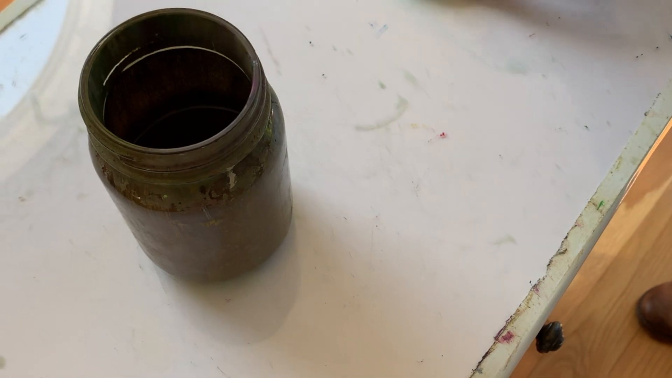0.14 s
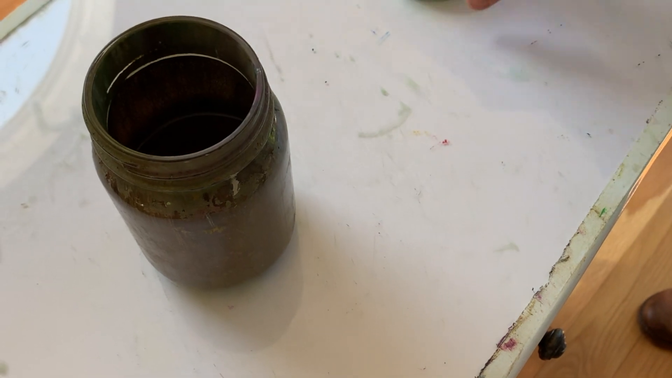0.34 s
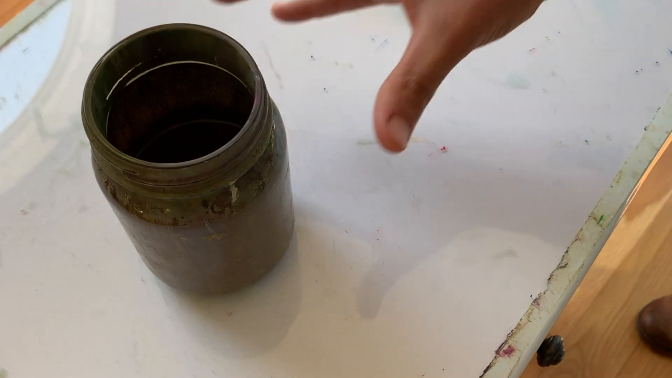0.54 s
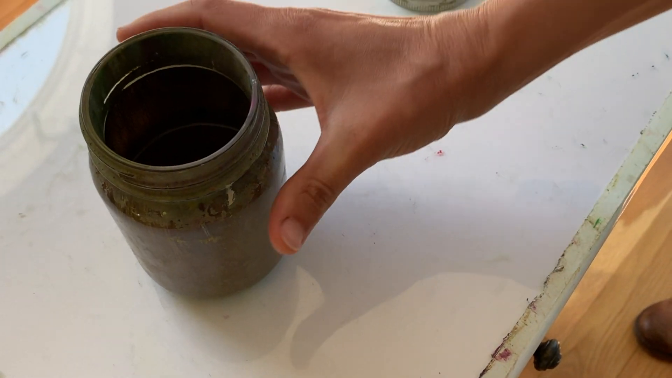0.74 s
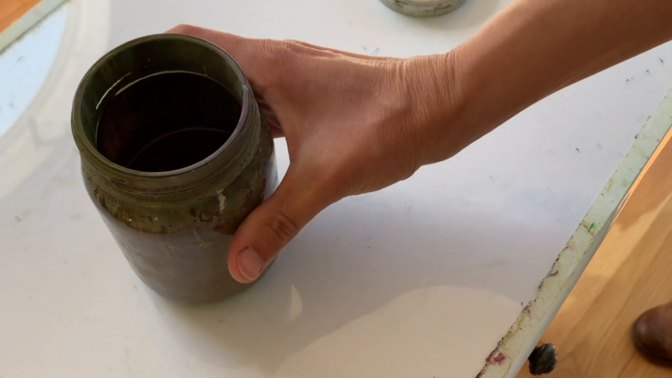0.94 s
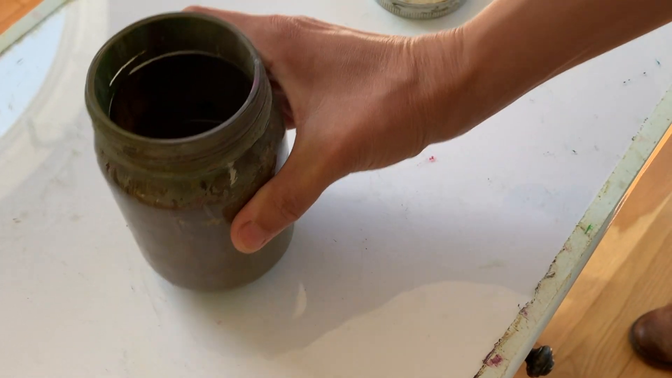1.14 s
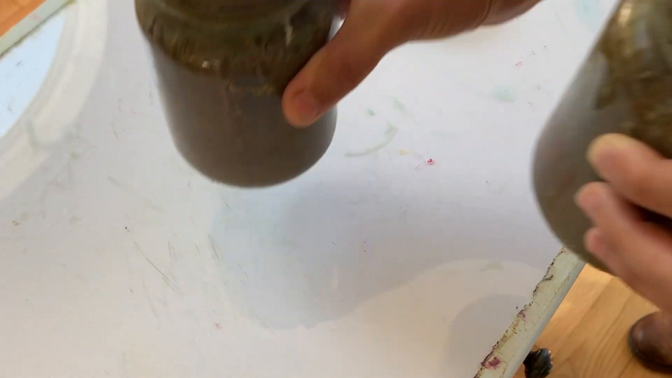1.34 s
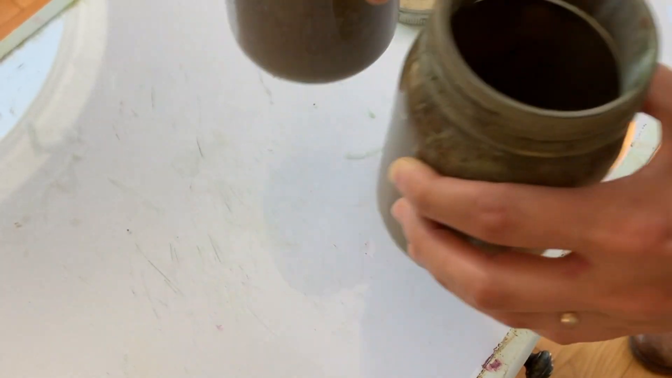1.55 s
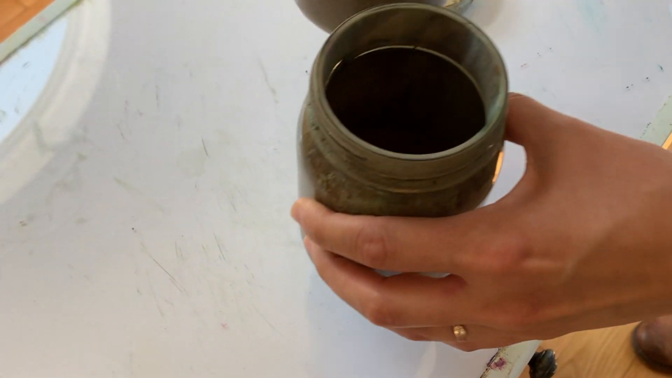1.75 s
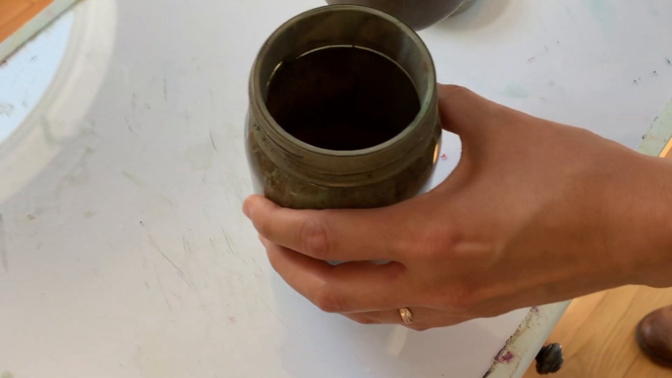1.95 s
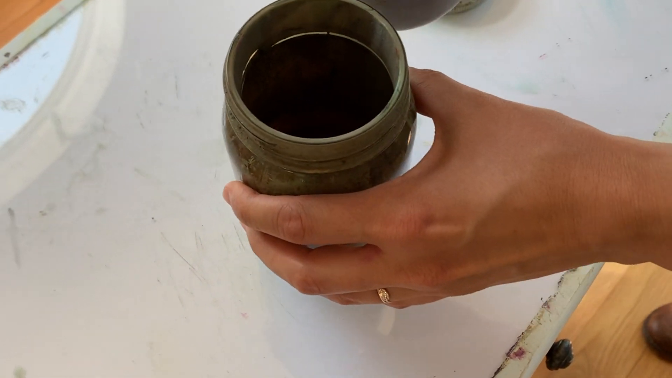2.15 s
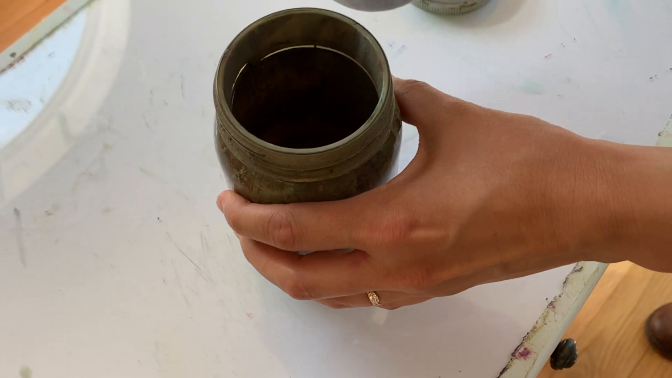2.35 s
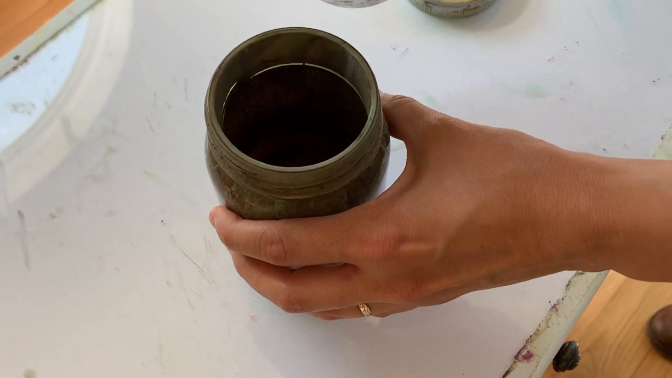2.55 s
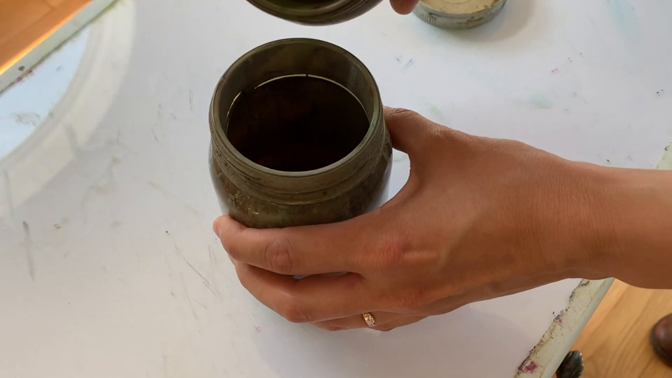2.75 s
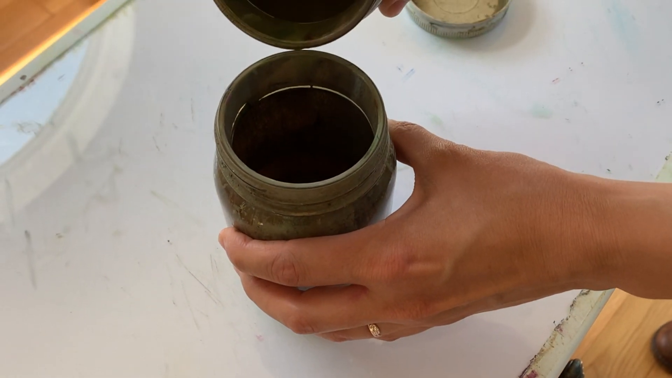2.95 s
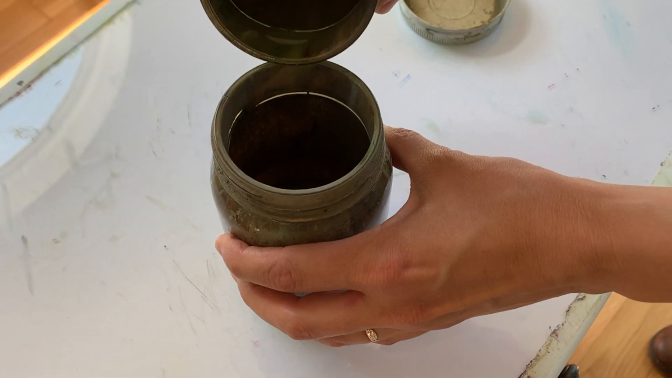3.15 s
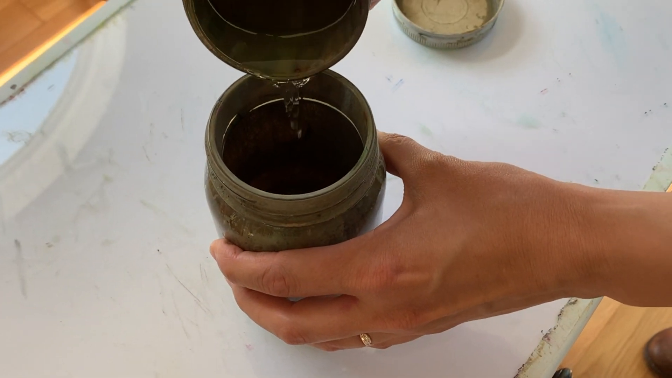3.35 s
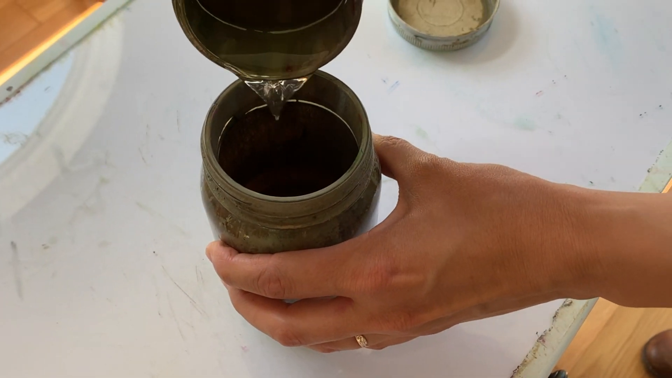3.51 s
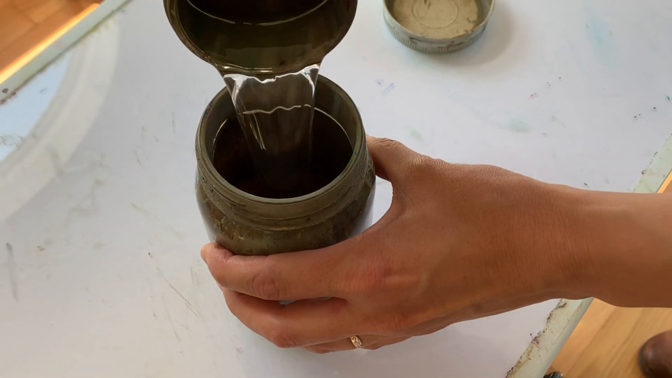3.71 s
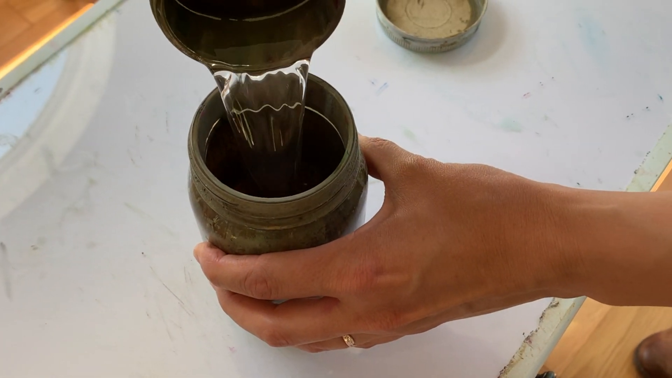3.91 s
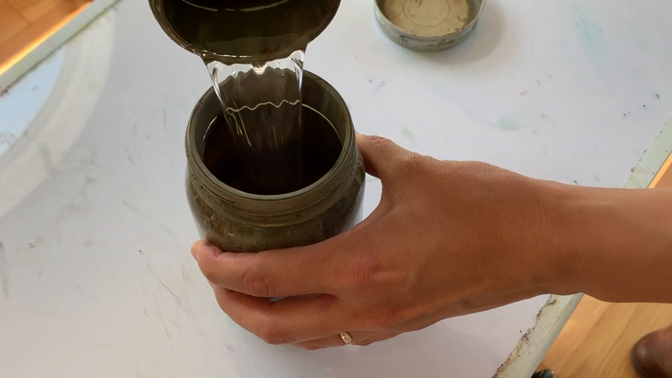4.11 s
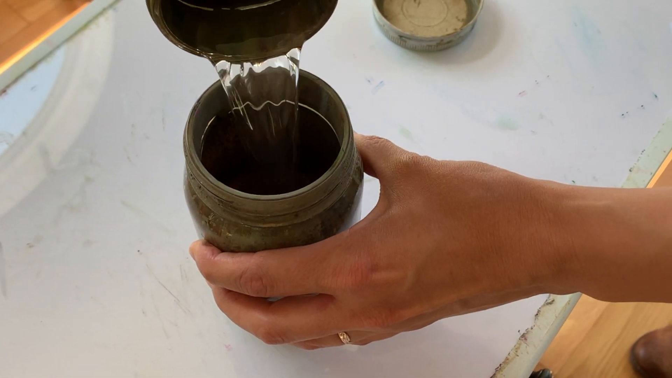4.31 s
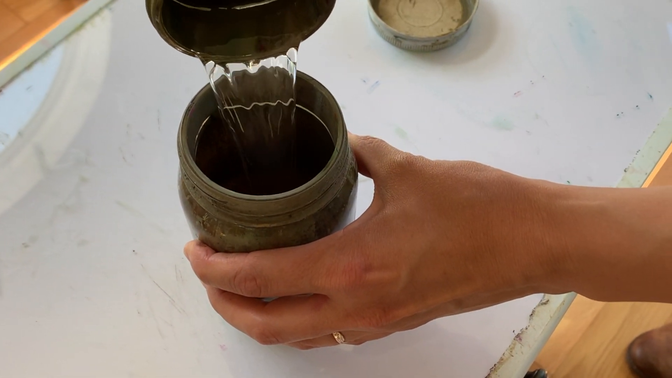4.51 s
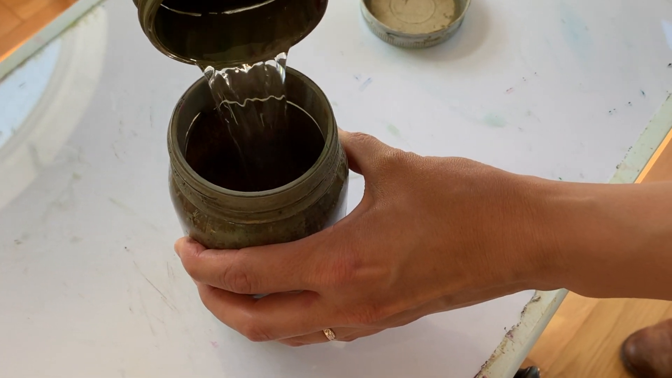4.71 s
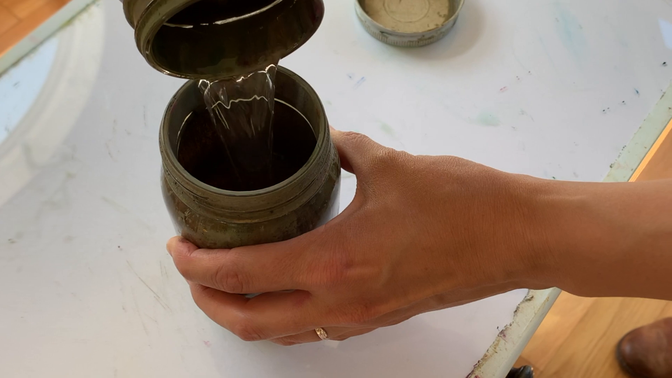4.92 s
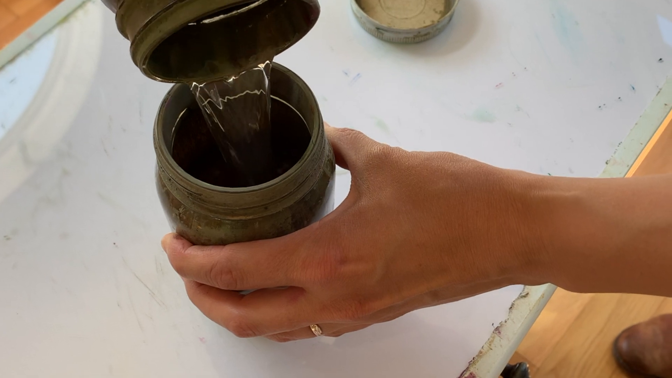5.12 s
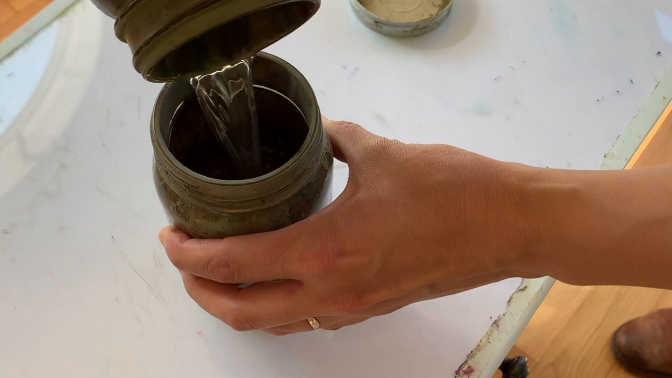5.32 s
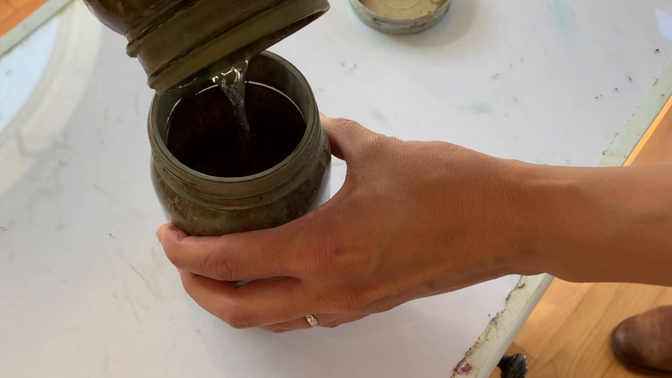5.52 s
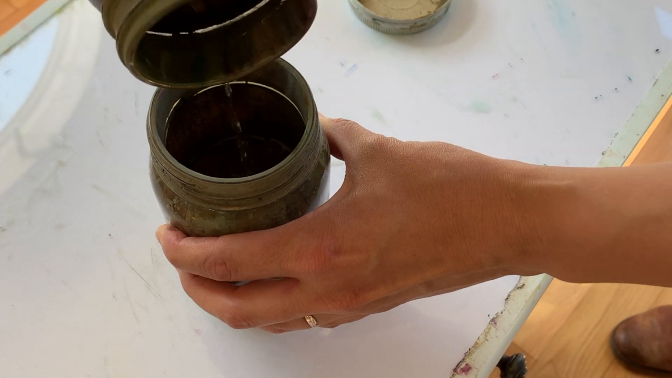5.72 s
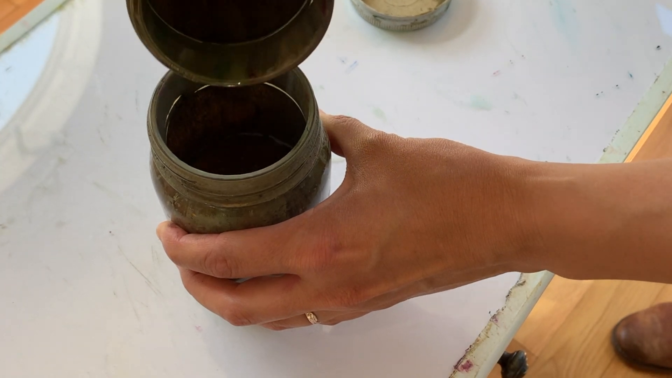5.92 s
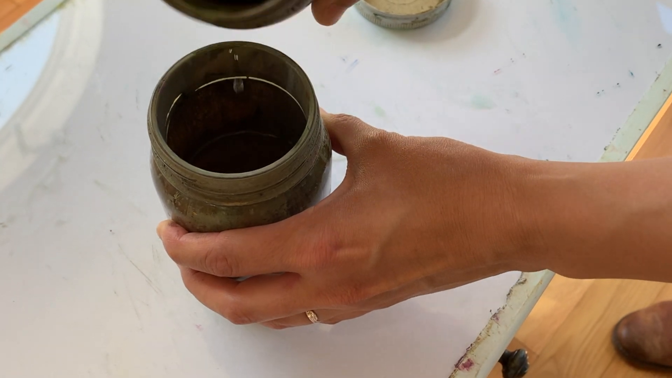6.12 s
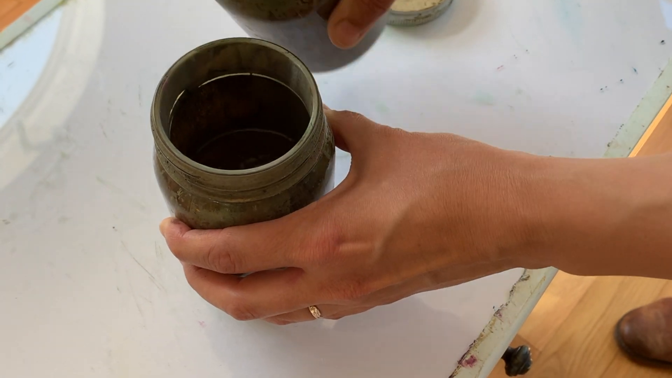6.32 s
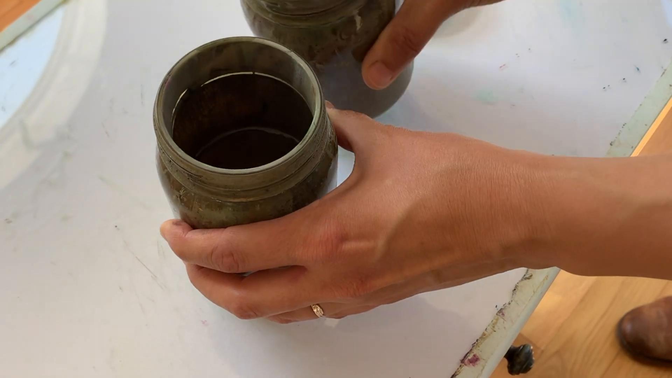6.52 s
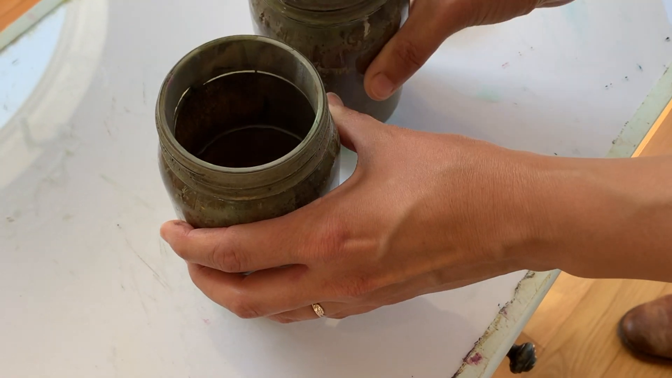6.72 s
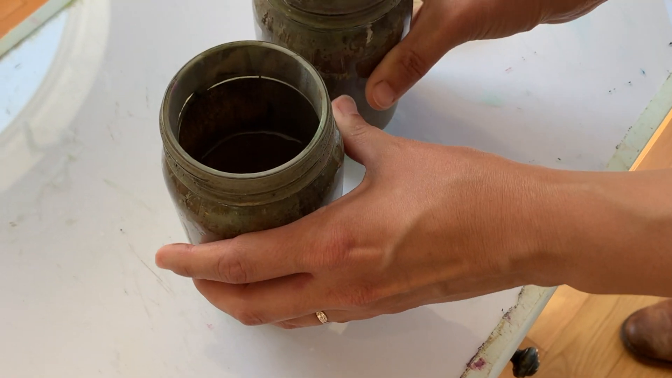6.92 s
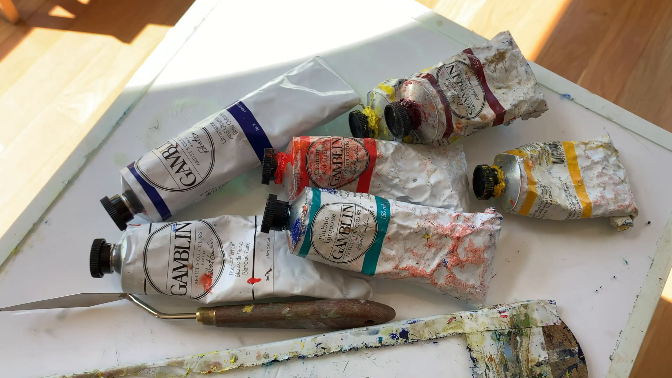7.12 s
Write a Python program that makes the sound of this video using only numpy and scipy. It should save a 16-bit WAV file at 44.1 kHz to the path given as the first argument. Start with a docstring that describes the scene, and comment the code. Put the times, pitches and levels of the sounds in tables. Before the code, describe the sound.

A quiet room with low rumble and faint hiss, heard close in stereo with short, sparse reflections. At 0 s the weak tail of a jar knock fades; a small double tick and touch come at 0.25 s. Soft thumps, brushes and skin rustle pass from 0.9 to 2.4 s. At 2.43 s a jar lands with a loud, sharp crack and short tabletop boom, with tiny bounces at 2.6 and 2.73 s. Near-silence follows. At 3.6 s bright drops start a pour, fullest around 3.9-4.2 s with fizz, churning and rapid rising bubbles, then thinning to a light trickle as the jar's air note climbs. Deeper bloops sound at 5.4-5.5 s and last drips at 5.7-5.85 s. Quiet returns; at 6.6 s a boomy, rattly knock, a ticking scrape near 6.8 s, a duller glassy knock at 6.87 s, then faint rustling to about 7.1 s.

```python
"""Glass jars are set down on a thin tabletop in a quiet room, close to a two-port microphone: table and glass
ring as decaying sines under a noisy crack and rattle. Water is poured from jar to jar: noise bursts for drops,
filtered grains for fizz, gurgle and the air note in the jar, rising sines for large bubbles.
Around them lie soft touches, ticks, thumps, a rustle of skin and cloth, and the hush of the room.
Sparse decaying echoes add distance; a tone colour with narrow dips shapes the mid signal."""
import sys
import numpy as np
from scipy import signal
from scipy.fft import rfft, irfft, next_fast_len
from scipy.io import wavfile
from scipy.ndimage import uniform_filter1d

SR = 44100
rng = np.random.default_rng(int(sys.argv[2]) if len(sys.argv) > 2 else 0)


def generate_wav(signal):
    """Clip the signal to [-1, 1] and save it as 16-bit WAV at the path in sys.argv[1]."""
    frames = np.transpose(np.atleast_2d(signal))
    scaled = np.clip(frames, -1, 1) * 32767
    pcm = np.round(scaled).astype(np.int16)
    wavfile.write(sys.argv[1], SR, pcm)


N = 315756  # samples

# jars set down, the first just before the opening so that only its tail is heard: (time [s], level [dB],
# brightness [dB/octave], table boom [dB], glass ring [dB], crack [dB], rattle [dB], boom tilt [dB/octave])
KNOCKS = [(-.03, -28, 4.3, -19, -24, -16.5, -3.5, 2), (2.435, -4, 0.63, -5.5, -12, -4.5, -21, 0),
          (6.6157, -9, -1.5, 2, -20, -12.5, -12.5, 1.5), (6.8729, -6, -9.5, -5.5, -7.5, -1.5, -11, 1)]
# a jar rocking back onto the table: (time [s], level [dB])
BOUNCES = [(2.603, -29.5), (2.734, -30.5), (6.822, -22)]
# the dull contact all bounces share: the columns of a knock from brightness on
BOUNCE_CONTACT = (-9.5, 2.5, -5.5, -11, -15.5, -2.5)
# modes of the tabletop: (frequency [Hz], level [dB], t60 [s])
TABLE_MODES = [(121.8, 1.5, 0.2), (170.5, 1.5, 0.17), (245.3, 4, 0.083), (383, -4, 0.03),
               (509.7, -4.5, 0.12), (525.4, -7.5, 0.3), (651, -13, 0.1), (726, -13.5, 0.12),
               (1130, 5, 0.014), (1350, -14.5, 0.05)]
# modes of a jar: (frequency [Hz], level [dB], t60 [s])
GLASS_MODES = [(1534, 0, .03), (1655, -2, .04), (2110, -4, .04), (2512, -8, .04), (6625, -3, .08)]
# spectrum of first contact: (frequency [Hz], level [dB])
CRACK_SPECTRUM = [(150, -33), (400, 3.5), (1000, -4.5), (1600, 1.5), (2600, -11.5), (4000, -18.5),
                  (6800, -18), (9500, -22), (13000, -28.5)]
# stereo spread of sounds on the table: (frequency [Hz], side over mid [dB])
TABLE_SIDE = [(60, -4), (130, -17), (290, -9), (640, -2), (1410, 0), (3100, 2), (6820, 0), (15000, 5)]
# decay of the room: (frequency [Hz], t60 [s])
ROOM_T60 = [(125, 0.33), (500, 0.49), (1000, 0.31), (2500, 0.43), (6500, 0.39), (12000, 0.22)]
# echo against direct sound: (frequency [Hz], level [dB])
ROOM_COLOUR = [(125, -1.5), (500, -9), (2000, -10.5), (5000, -3.5), (8000, -7.5), (10000, -18.5)]
# spectrum of the quiet room: (frequency [Hz], relative level [dB])
HUSH_SPECTRUM = [(20, -23.5), (38, -7), (60, 5.5), (105, -6.5), (139, -24), (195, -10), (479, -28.5),
                 (670, -37), (966, -47), (1690, -41.5), (4790, -52.5), (6910, -46), (15200, -58.5)]
# stereo spread of the quiet room: (frequency [Hz], side over mid [dB])
HUSH_SIDE = [(60, -17.5), (110, 4), (200, -3), (380, 5), (700, 14.5), (1290, 11), (2380, 6), (4400, 8),
             (8120, -10.5), (15000, 5.5)]
# depth of the drifting patches in the hush: (frequency [Hz], depth [dB])
PATCH_DEPTH = [(60, 1.2), (200, 3), (700, 3.5), (3000, 2.5), (8000, .8)]
# skin and cloth moving: (time [s], rustle level [dB])
MOVES = [(.4, -77.5), (.55, -93), (.64, -76), (.73, -85), (.85, -82.5), (1.19, -85.5), (1.45, -70.5),
         (1.58, -78), (1.95, -74.5), (2.19, -89.5), (2.35, -75), (2.69, -94.5), (2.95, -82), (3.1, -88.5),
         (6.5, -83), (6.8, -58.5), (7.0, -81), (7.16, -75)]
# spectrum of the rustle: (frequency [Hz], relative level [dB])
RUSTLE_SPECTRUM = [(300, -17), (600, 6), (1200, -4.5), (2300, -5.5), (4200, -13.5), (5200, -21.0), (16000, -47.0)]
# soft touches of hands and jars: (time [s], level [dB], centre [Hz], length [ms])
TOUCHES = [(0.246, -40.5, 950, 3), (0.246, -46, 1950, 13.5), (0.253, -38, 754, 5.6), (1.026, -64, 1200, 12),
           (1.053, -66, 2800, 25), (1.066, -58, 2400, 4), (1.419, -48.5, 460, 23),
           (1.595, -60.5, 1640, 8.3), (1.933, -53.5, 3540, 1.1), (2.164, -59.5, 2000, 18),
           (2.398, -56, 1720, 36), (2.715, -62.5, 614, 9.4), (2.752, -66, 1880, 6.4),
           (2.89, -62.5, 1770, 8.4), (6.601, -38.5, 1510, 47), (6.782, -46.5, 241, 120),
           (6.768, -47.5, 1830, 11), (0.929, -66, 2130, 15), (1.212, -66.5, 2400, 15),
           (1.352, -56.5, 343, 27), (6.859, -41.5, 1610, 39)]
# bright ticks of a ring or nail on glass: (time [s], level [dB])
TICKS = [(0.2471, -49), (0.254, -52), (1.2196, -61), (6.774, -36.5), (6.7905, -46.5), (6.9795, -59),
         (7.0284, -61)]
# low thumps as weight shifts on the tabletop: (time [s], level [dB], frequency [Hz], length [s])
THUMPS = [(0.925, -44.5, 96, .09), (1.058, -50, 115, .04), (2.735, -45, 125, .04)]
# faint thin whistles around the start and end of the pour, each: (time [s], frequency [Hz], level [dB])
WHISTLES = [
    [(3.22, 4290, -86), (3.48, 3570, -89)],
    [(3.51, 3420, -91), (3.56, 3360, -69.5), (3.63, 3295, -84.5)],
    [(5.85, 7020, -87.5), (6.2, 6870, -81.5), (6.55, 6900, -82)],
]
# the stream: (time [s], spray level [dB], gurgle level [dB])
POUR = [(3.62, -67.5, -100), (3.76, -61.5, -67.5), (3.83, -56.5, -66), (3.95, -52, -53.5), (4.17, -53, -53),
        (4.25, -62, -61.5), (4.31, -62.5, -76), (4.42, -64.5, -60), (4.55, -67.5, -71), (4.8, -66, -74.5),
        (4.9, -66, -72), (5.1, -69.5, -82.5), (5.32, -74.5, -107), (5.4, -62.5, -65.5), (5.53, -75, -62),
        (5.6, -70, -68), (5.74, -75, -59), (5.84, -94, -94), (6.0, -82, -100)]
# as the jar fills: (time [s], note of the air above the water [Hz], note over gurgle [dB],
# typical bubble pitch [Hz])
FILL = [(3.95, 508, -21, 1990), (4.05, 530, -8, 1720), (4.2, 547, -2.5, 1420), (4.4, 623, 3, 1620),
        (4.7, 690, -9.5, 2520), (5.0, 721, 5, 2080), (5.4, 744, 11.5, 1420), (5.71, 758, 0, 1370),
        (5.8, 718, 17, 1370)]
# spectrum of the spray: (frequency [Hz], relative level [dB])
FIZZ_SPECTRUM = [(2800, -18), (3700, 6), (4500, 1.5), (6200, 6), (8500, 6.5), (10600, -3), (13500, -7),
                 (15500, -2)]
# bands the jar lends the gurgle: (frequency [Hz], width [Hz], gain [dB])
WET_JAR = [(1007, 50, 9.5), (1440, 80, 7.5), (1860, 87, 10), (2760, 40, 9)]
# churning band that the stream keeps up in the jar: (time [s], level [dB])
CHURN = [(3.62, -100), (3.9, -58), (4.25, -61), (4.5, -66), (4.85, -69), (5.15, -83), (5.33, -85),
         (5.42, -69.5), (5.7, -74.5), (5.9, -102)]
# the loudest drops striking the water: (time [s], level [dB])
DROPS = [(3.6266, -49), (3.675, -43.5), (3.7455, -40), (3.8326, -42), (3.8473, -48), (3.921, -46),
         (4.738, -59), (4.883, -64), (5.0034, -60), (5.3683, -58), (5.3832, -56.5), (5.478, -56.5),
         (5.5313, -54), (5.4054, -57.5), (5.5078, -54), (5.6595, -50), (5.6998, -57.5), (5.7594, -50.5),
         (5.8005, -55), (5.8296, -56.5), (5.8414, -56)]
# large bubbles: (time [s], level [dB], starting pitch [Hz])
BUBBLES = [(3.741, -54, 1750), (3.895, -43.5, 1708), (3.934, -46, 1442), (4.037, -36.5, 1816),
           (3.949, -48, 1887), (4.06, -46, 1870), (4.145, -49, 998), (4.929, -53, 2760), (4.096, -49, 1920),
           (4.245, -51, 1024), (3.851, -47.5, 1746), (3.917, -43.5, 1829), (3.986, -51, 1372),
           (4.024, -33, 1450), (4.049, -33.5, 1845), (4.173, -52, 1312), (4.222, -49.5, 1005),
           (4.008, -49, 2300), (4.408, -57, 2300), (4.47, -58, 2350), (4.648, -60, 2500),
           (4.838, -54, 2350), (5.004, -57, 2850), (4.837, -50, 2800), (4.884, -42, 1370),
           (5.004, -48.5, 2299), (5.391, -45, 972), (5.404, -43, 750.5), (5.433, -36.5, 715.4),
           (5.448, -48.5, 458), (5.486, -38.5, 487.6), (5.385, -53, 4410), (5.405, -51.5, 4280),
           (5.4034, -50, 1540), (5.535, -53, 500), (5.628, -56, 600), (5.508, -53.5, 4346),
           (5.534, -61, 2500), (5.614, -52, 5570), (5.7082, -54, 1590), (5.761, -61, 1770),
           (5.842, -64, 3950), (5.735, -43, 717), (5.71, -42, 643), (5.734, -41, 1037)]
# stereo spread of the water: (frequency [Hz], side over mid [dB])
POUR_SIDE = [(270, -15.5), (450, -11), (740, 0), (1220, -7), (2010, -1), (3330, 5.5), (5500, 5),
             (9080, -14), (15000, 13)]
# tone colour of the mid signal, with narrow dips: (frequency [Hz], gain [dB])
MID_COLOUR = [(25, -26.5), (42, -1.5), (2800, -3.5), (3250, -5.5), (3700, -1.5), (4500, -2.5), (5100, -11),
              (5800, -2), (11000, 0), (12300, -17), (13300, 0.5)]

LEAD = 4410  # samples computed ahead of zero
HUSH_DB = -56.5  # mid level ahead of the tone colour
TICK_HZ, DROP_HZ = 7400, 7810  # nominal centres
SCATTER = 0.06  # greatest upward stray of a centre, as a share
POUR_S = (3.62, 6.0)  # the water runs from, to
SIZE_SPREAD = 0.5  # scatter of bubble pitch round the typical one, as a log ratio
CHURN_HZ, CHURN_WIDTH_HZ = 2353, 262
BUBBLE_T60_S, BUBBLE_DAMPING = 0.043, 0.23  # ring time at 1 kHz; it falls by this power of pitch
EDGE_HZ = 15900  # upper band limit


def amp(db):
    """Decibels to linear gain."""
    return 10 ** (np.asarray(db) / 20)


def evened(x):
    """Scales to an rms of 1."""
    return x / np.sqrt(np.mean(x ** 2) + 1e-20)


def read(points, hz):
    """Reads a curve along log frequency."""
    f, value = np.transpose(points)
    return np.interp(np.log(hz + 1), np.log(f + 1), value)


def columns(rows):
    """Reads each column of a time table at every sample."""
    s, *cols = np.transpose(rows)
    return [np.interp(np.arange(N) / SR, s, c) for c in cols]


def add(mix, s, sound):
    """Lays a sound into the mix from s seconds on."""
    part = mix[round(s * SR):][:len(sound)]
    part += sound[:len(part)]


def colour(x, points):
    """Filters by a spectrum in dB."""
    n = next_fast_len(x.shape[-1])
    gain = amp(read(points, np.fft.rfftfreq(n, 1 / SR)))
    return irfft(rfft(x, n) * gain, n)[..., :x.shape[-1]]


def resonate(x, hz, width):
    """Shifts the curve hz down to zero, smooths, and shifts back: a resonance of gain 1."""
    turn = np.exp(2j * np.pi * np.cumsum(hz * np.ones(len(x))) / SR)
    r = np.exp(-np.pi * width / SR)
    return 2 * (turn * signal.lfilter([1 - r], [1, -r], x / turn)).real


def flutter(width, depth_db, size=N):
    """Random gain, slowed by smoothing twice over width samples."""
    drift = uniform_filter1d(uniform_filter1d(rng.standard_normal(size), width), width)
    return amp(depth_db * evened(drift))


def grainy(per_s, spread_db, bed, size=N):
    """Sparse clicks of uneven size over a bed of plain noise."""
    sign, chance, plain = rng.standard_normal(size), rng.random(size), rng.standard_normal(size)
    sizes = amp(spread_db * np.minimum(rng.exponential(1, size), 4))
    clicks = sign * sizes * (chance < per_s / SR)
    return evened(evened(clicks) + bed * plain)


def ports(x, side):
    """Two close ports hear one source with a phase gap: the side is the mid turned a quarter cycle."""
    turned = colour(signal.hilbert(x, next_fast_len(len(x)))[:len(x)].imag, side)
    return np.array([x - turned, x + turned])


def room(x):
    """Sparse echoes of random sign, each band dying at its own speed, partly shared between channels."""
    taps = np.zeros((2, SR // 2))
    at = np.arange(200, SR // 2 - 20, 10) + rng.integers(0, 10, (2, (SR // 2 - 211) // 10))
    np.put_along_axis(taps, at, rng.choice([-1., 1.], at.shape), 1)
    taps += .6 * taps[::-1]
    hz, t, z = signal.stft(taps, SR, nperseg=256)
    decay = amp(-60 * t / read(ROOM_T60, hz)[:, None])
    tail = signal.istft(z * decay, SR, nperseg=256)[1]
    tail = colour(tail / np.linalg.norm(tail[0]), ROOM_COLOUR)
    tail *= flutter(300, 0.83, tail.shape[1])  # echoes arrive in clumps
    return signal.fftconvolve(x[None], tail, axes=1)[:, :len(x)]


def ring(modes, t, scatter_db, tilt_db=0):
    """Decaying sines that build up over a cycle or two; the point of contact shifts each mode's share."""
    total = np.zeros(len(t))
    for hz, db, t60 in modes:
        start_db = db + tilt_db * np.log2(hz / 250) + scatter_db * rng.standard_normal()
        total += amp(start_db - 60 * t / t60) * (1 - np.exp(-t * hz / 1.3)) * np.sin(2 * np.pi * hz * t)
    return total


def knocks():
    """A blow rings table and glass, with a short loose rattle; each knock has its own brightness."""
    near, far = np.zeros(N + LEAD), np.zeros(N + LEAD)
    t = np.arange(16384) / SR
    hz = np.fft.rfftfreq(len(t), 1 / SR)
    lag = np.exp(-4j * np.pi * 0.046 * np.sqrt(hz + 60))  # bending waves: bass travels slower
    hit, rebound = np.exp(-((t - .001) * 25000) ** 2), np.exp(-((t - .0016) * 25000) ** 2)
    crack = colour(hit - 0.39 * rebound, CRACK_SPECTRUM)
    crack = crack / abs(crack).max()
    contacts = KNOCKS + [row + BOUNCE_CONTACT for row in BOUNCES]
    for s, db, slope_db, boom_db, glass_db, crack_db, rattle_db, tilt_db in contacts:
        noise = evened(colour(rng.standard_normal(len(t)), CRACK_SPECTRUM))
        rattle = noise * np.exp(-t / 0.0079) * (t > .001)
        boom = amp(boom_db) * ring(TABLE_MODES, t, 0.51, tilt_db)
        body = boom + amp(glass_db) * ring(GLASS_MODES, t, 0.59)
        clatter = amp(crack_db) * crack + amp(rattle_db) * rattle
        # the ringing is heard close by, less of it fills the room
        blow = np.array([0.13 * body + clatter, 0.03 * body + clatter])
        blow = irfft(rfft(blow) * lag * amp(slope_db * np.log2(1 + hz / 1000)))
        blow = amp(db) * blow * np.clip((.35 - t) * 20, 0, 1)  # faded out by 0.35 s
        add(near, s + LEAD / SR, blow[0])
        add(far, s + LEAD / SR, blow[1])
    return ports(near[LEAD:], TABLE_SIDE) + room(far)[:, LEAD:]


def hush():
    """Room rumble and hiss: random short-time spectra with drifting patches, deepest in the middle range."""
    frames, hz = N // 512 + 5, np.fft.rfftfreq(2048, 1 / SR)
    a, b, c, d, patches = rng.standard_normal((frames, 1025, 5)).T
    patches = evened(uniform_filter1d(uniform_filter1d(patches, 20, 0), 5, 1))
    patch_db = read(PATCH_DEPTH, hz)[:, None] * patches
    z = np.array([a + 1j * b, (c + 1j * d) * amp(read(HUSH_SIDE, hz))[:, None]])
    z = z * amp(read(HUSH_SPECTRUM, hz)[:, None] + patch_db)
    mid, side = signal.istft(z, nperseg=2048, noverlap=1536)[1][:, :N]
    return amp(HUSH_DB) * np.array([mid + side, mid - side]) / mid.std()


def movement():
    """A grainy, uneven rustle of skin and cloth, partly shared between channels."""
    rustle_db, = columns(MOVES)
    rustle = np.array([grainy(900, 2.2, 1.1) for _ in range(2)])
    rustle = colour(rustle + 0.5 * rustle[::-1], RUSTLE_SPECTRUM)
    return amp(rustle_db) * evened(rustle * flutter(1500, 1.4))


def touches():
    """Dull puffs of noise, wide round their centre, with a soft start."""
    out, t = np.zeros(N), np.arange(8000) / SR
    for s, db, hz, ms in TOUCHES:
        noise = rng.standard_normal(len(t))
        puff = evened(resonate(resonate(noise, hz, 0.32 * hz), hz, 0.81 * hz))
        swell = (1 - np.exp(-4000 * t / ms)) * np.exp(-1000 * t / ms)
        add(out, s, amp(db) * puff * swell)
    return out


def snaps(rows, centre_hz, width_hz, decay_s, tail_db):
    """Ticks or drops: sharp bursts of noise round a centre, with a brief spray behind."""
    out, t = np.zeros(N), np.arange(2000) / SR
    for s, db in rows:
        hz = centre_hz * (1 + SCATTER * rng.uniform(-1.53, 1))
        noise = rng.standard_normal(len(t))
        burst = evened(resonate(resonate(noise, hz, width_hz), hz, width_hz))
        fall = np.exp(-t / decay_s) + amp(tail_db) * np.exp(-t / 0.0045)
        add(out, s, amp(db) * burst * (1 - np.exp(-t / 0.00028)) * fall)
    return out


def thumps():
    """A few cycles of the table flexing: a quick swell, a hold, a damped end."""
    out = np.zeros(N)
    for s, db, hz, length in THUMPS:
        t = np.arange(0, length, 1 / SR)
        swell = np.sqrt(abs(np.sin(np.pi * t / length)))
        add(out, s, amp(db) * swell * np.sin(2 * np.pi * hz * t))
    return out


def whistles():
    """Unsteady bands of noise, the higher the wider."""
    out = np.zeros(N)
    for rows in WHISTLES:
        hz, db = columns(rows)
        width = 1.2 * (rows[-1][1] / 1000) ** 3.3
        on = slice(round(rows[0][0] * SR), round(rows[-1][0] * SR))
        band = evened(resonate(resonate(rng.standard_normal(N), hz, width), hz, 2 * width) * flutter(900, 2.8))
        out[on] += (amp(db) * band)[on]
    return out


def spray(n):
    """Fine droplets: each size of droplet comes in its own clusters of bright grains."""
    specks = np.zeros(n)
    for hz in np.geomspace(3600, 15000, num=12):
        grains = grainy(360, 4.9 * min(hz / 6000, 1), 1.4, n) * flutter(400, 4.8, n)
        specks += resonate(resonate(grains, hz, 0.18 * hz), hz, 0.18 * hz)
    return evened(colour(specks, FIZZ_SPECTRUM) * flutter(150, 1.0, n))


def gurgling(n, centre_hz):
    """A cloud of small bubbles, sizes scattered round the centre, heard through the bands of the jar."""
    cloud, t = np.zeros(n), np.arange(2048) / SR
    for hz in np.geomspace(750, 3100, num=30):
        pop = np.exp(-t * hz / 9) * (1 - np.exp(-t / 0.00055)) * np.sin(2 * np.pi * hz * t)
        share = np.exp(-(np.log(hz / centre_hz) / SIZE_SPREAD) ** 2)
        births = grainy(60, 3.2, 0.3, n) * share
        cloud += signal.oaconvolve(births, pop / np.linalg.norm(pop))[:n]
    # the jar's bands shape the scaled cloud
    cloud = 0.47 * cloud
    gurgle = cloud.copy()
    for hz, width, db in WET_JAR:
        drift = flutter(2500, .2, n)  # the bands drift as the surface heaves
        gurgle += amp(db) * resonate(cloud / 0.47, hz * drift, width) * flutter(500, 4.6, n)
    return evened(gurgle)


def air_note(n, note_hz):
    """The shrinking air space resonates to grains; the heaving surface shakes its note."""
    note_hz = note_hz * flutter(1200, .25, n)
    note = resonate(resonate(grainy(80, 2.7, 1.0, n), note_hz, 40), note_hz, 430)
    return evened(note * flutter(600, 2.8, n))


def churning(n):
    """Five neighbouring, unsteady resonances make the churning band."""
    churn = np.zeros(n)
    for hz in CHURN_HZ + CHURN_WIDTH_HZ * np.linspace(-.5, 1.5, num=5):
        band = resonate(grainy(150, 3.5, .8, n), hz * flutter(1500, .25, n), 95)
        churn += resonate(band, hz, 300) * flutter(600, 4, n)
    return evened(churn)


def stream():
    """Spray, small bubbles, churn and the note of the air space follow the pour and the filling jar."""
    on = slice(round(POUR_S[0] * SR), round(POUR_S[1] * SR))
    n = on.stop - on.start
    curves = np.array(columns(POUR) + columns(FILL) + columns(CHURN))[:, on]
    fizz_db, gurgle_db, note_hz, note_db, centre_hz, churn_db = curves
    fizz = amp(fizz_db) * spray(n)
    inside = amp(gurgle_db) * (gurgling(n, centre_hz) + amp(note_db) * air_note(n, note_hz))
    out = np.zeros(N)
    out[on] = amp(churn_db) * churning(n) + fizz + inside
    return out


def bubbles():
    """Each bubble rings briefly and unsteadily, its pitch climbing as it nears the surface."""
    out, t = np.zeros(N), np.arange(5000) / SR
    for s, db, hz in BUBBLES:
        t60 = BUBBLE_T60_S * (1000 / hz) ** BUBBLE_DAMPING  # smaller bubbles die sooner
        swell = amp(-60 * t / max(t60, .005)) * (1 - np.exp(-t * hz / 3))
        wobble = 1 + 0.33 * evened(uniform_filter1d(rng.standard_normal(len(t)), 120))
        quiver = 0.02 * np.cumsum(evened(uniform_filter1d(rng.standard_normal(len(t)), 150))) / SR
        tone = np.sin(2 * np.pi * hz * (t + 1.7 * t ** 2 + quiver))
        add(out, s, amp(db) * swell / swell.max() * wobble * tone)
    return out


def scene():
    """Places hands and water close to the ports, with their echoes, in the quiet room."""
    hands = touches() + snaps(TICKS, TICK_HZ, 5300, 0.00039, -14.5)
    water = whistles() + stream() + snaps(DROPS, DROP_HZ, 2120, 0.0027, -1.2)
    pops = bubbles()
    near = ports(water + pops, POUR_SIDE) + ports(hands + thumps(), TABLE_SIDE)
    echoes = amp(-1.5) * room(water + hands + amp(-4) * pops)
    return knocks() + near + echoes + hush() + movement()


def record(dry):
    """A tone colour with narrow dips shapes the mid signal; then both channels are band-limited."""
    mid, side = colour(dry.mean(0), MID_COLOUR), (dry[0] - dry[1]) / 2
    both = np.array([mid + side, mid - side])
    lowpass = signal.firwin(511, EDGE_HZ, window=("kaiser", 9), fs=SR)
    return signal.oaconvolve(both, lowpass[None], "same")


dry = scene()
out = record(dry)
generate_wav(out)
```